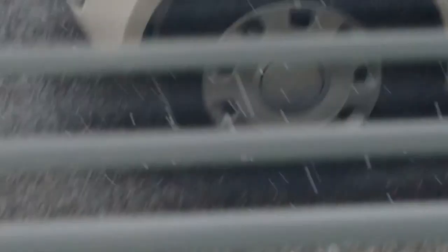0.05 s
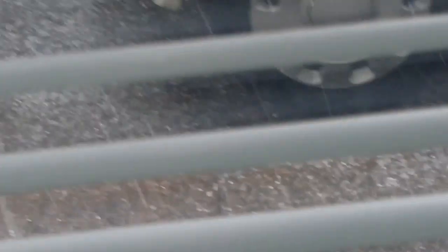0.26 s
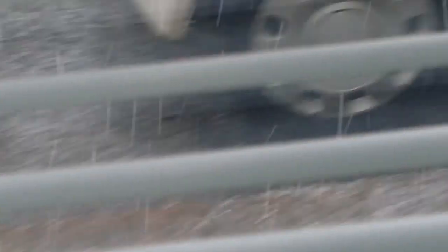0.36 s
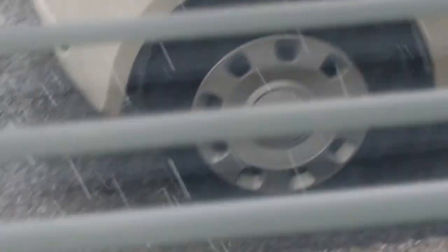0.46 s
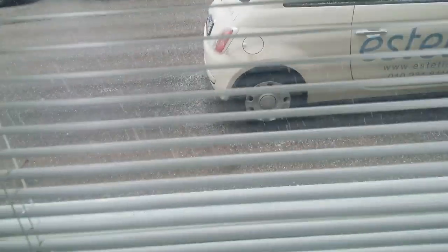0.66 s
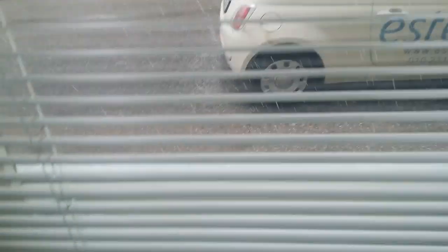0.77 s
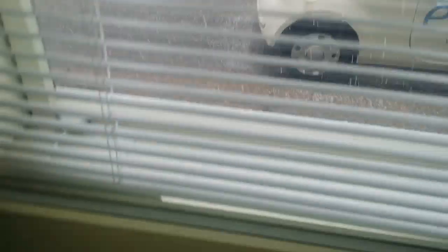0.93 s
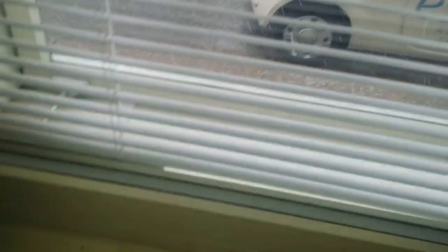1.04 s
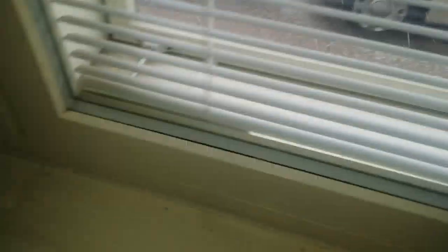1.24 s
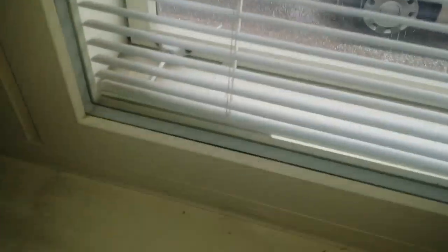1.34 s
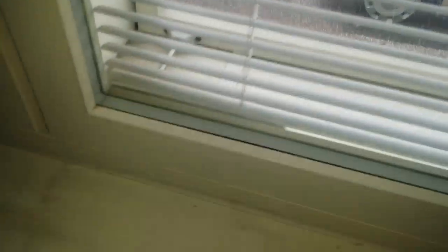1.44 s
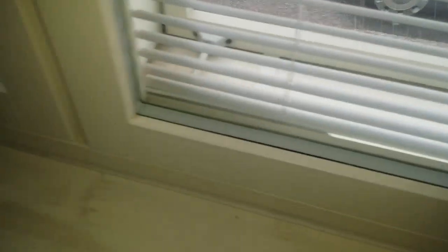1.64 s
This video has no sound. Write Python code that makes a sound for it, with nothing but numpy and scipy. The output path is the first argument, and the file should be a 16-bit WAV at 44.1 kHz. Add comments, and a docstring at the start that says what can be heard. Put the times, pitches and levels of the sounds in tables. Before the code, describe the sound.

Scattered hailstones rap on a windowpane and sill, briefly ringing the glass, heard from inside a room. Close, louder handling noise comes at the start and again past the middle: skin hissing across the microphone, sharp clicks and low bumps.

```python
"""Fingers rub close up as a hand shifts its grip on the microphone; then hail raps on a closed window.
Heard from indoors, single stones clatter on pane and sill and set the glass ringing, over a faint
wash of far hail. In front, at the blinds, skin hisses across the microphone's two ports and catches
with sharp snaps, while the casing rumbles, bumps and ticks under the hand."""
import sys
import numpy as np
from scipy import signal
from scipy.fft import rfft, irfft
from scipy.io import wavfile

SR = 44100
rng = np.random.default_rng(int(sys.argv[2]) if len(sys.argv) > 2 else 0)


def to_wav(sig):
    """Store sig (one row per channel, or 1-D mono) as 16-bit WAV at the path in sys.argv[1].

    Samples outside -1..1 are clipped; the rate is SR.
    """
    pcm = np.clip(np.atleast_2d(sig), -1, 1) * 32767
    pcm = np.round(pcm).astype(np.int16)
    wavfile.write(sys.argv[1], SR, pcm.T)  # frames by channels


N = 74970
T = np.arange(N) / SR


def from_db(db):
    """Decibels to gain."""
    return 10 ** (np.asarray(db) / 20)


def rms_one(x):
    """Scale to rms 1."""
    return x / np.sqrt(np.mean(x ** 2) + 1e-20)


def placed(db, pan_db):
    """Left and right gains; pan_db is left minus right."""
    return from_db(db + np.array([[.5], [-.5]]) * pan_db)


def coloured(spectrum, tilt_db=0):
    """Stereo noise of a given colour, tilted per octave; rms 1."""
    octave = np.log2(np.maximum(np.fft.rfftfreq(N, 1 / SR), 1))
    hz, db = np.transpose(spectrum)
    gain = from_db(np.interp(octave, np.log2(hz), db) + tilt_db * octave)
    return rms_one(irfft(rfft(rng.standard_normal((2, N))) * gain, N))


def resonant_noise(hz, width_hz):
    """Stereo noise twice through one resonance; rms 1."""
    r = np.exp(-np.pi * width_hz / SR)
    section = [1, 0, -1, 1, -2 * r * np.cos(2 * np.pi * hz / SR), r * r]
    return rms_one(signal.sosfilt([section, section], rng.standard_normal((2, N))))


def flicker(depth_db, per_s):
    """A randomly wavering gain of rms 1."""
    return rms_one(from_db(depth_db * np.interp(T * per_s, np.arange(N), rng.standard_normal(N))))


def swell(crest, rise, fall):
    """A bell-shaped envelope with its own rise and fall."""
    return np.exp(-((T - crest) / np.where(T < crest, rise, fall)) ** 2)


def pulse(start, rise_s):
    """Rises to 1 in rise_s, then dies away."""
    age = np.maximum(T - start, 0) / rise_s
    return age * np.exp(1 - np.minimum(age, 60))


def ring(start, hz, rise_s):
    """A heavily damped swing."""
    return pulse(start, rise_s) * np.sin(2 * np.pi * hz * (T - start))


def distant_hail():
    """Countless far stones merge into a faint, flickering wash."""
    # colour of the wash: freq_hz, level_db
    wash = [(30, -5), (70, 13.5), (130, 5), (250, -2), (600, -1.5), (1800, -2), (3500, -5.5), (6000, -4),
            (9000, -13), (16000, -9.5)]
    return placed(db=-73.5, pan_db=-.5) * coloured(wash) * flicker(depth_db=1.5, per_s=160)


def faint_rings():
    """Two brief mid-pitched rings: a hailstone's struck spot, then a port's hollow note under a finger."""
    # resonances: crest_s, rise_s, fall_s, level_db, pan_db, pitch_hz
    rings = [(.633, 0.0025, 0.0084, -64, 16.5, 2320), (1.306, 0.016, 0.029, -59.5, 12, 2920)]
    return sum(placed(db, pan_db) * swell(crest, rise, fall) * resonant_noise(hz, width_hz=740)
               for crest, rise, fall, db, pan_db, hz in rings)


def hailstones():
    """Each stone sets off a short, dense clatter and rings the struck spot and the pane."""
    # hits on the window: start_s, level_db, pan_db, tilt_db_per_octave, spot_hz
    stones = [(0.424, -63, 5, 1, 2430), (.462, -58, -8.5, 3, 2160), (0.629, -57.5, 1.5, -1.5, 2230),
              (0.689, -65.5, 6.5, -1, 1870), (.734, -60.5, 5, 2, 2050), (.872, -55, 2, -.5, 1850),
              (0.913, -57.5, 2, 0, 2100), (.941, -61, 5, 0.5, 1670), (.968, -55, 3.5, 0.5, 2300),
              (.979, -62.5, 1, -0.5, 1720), (1.038, -66, 0.5, 3, 2160), (1.344, -52.5, 4, 1.5, 2070),
              (1.423, -53, -1, -0.5, 2770), (1.482, -54, -1.5, 0, 2220), (1.546, -63, 0, 0.5, 2030),
              (1.58, -54.5, 3, 0.5, 2190), (1.594, -54.5, -1, -1, 1570), (1.620, -60, 6, -4, 1980),
              (1.646, -55, 1.5, 0.5, 1730)]
    # colour of the window's clatter: freq_hz, level_db
    window = [(100, -10), (350, -9), (600, -15), (850, -5), (1300, -6.5), (1900, -1.5), (3000, -6.5),
              (5500, -10.5), (8500, -24), (16000, -28)]
    # ringing modes of the glass: pitch_hz, level_db
    pane_modes = [(770, -11), (950, -27), (1190, -19.5), (1710, -15), (2060, -18.5)]
    attack_s, clatter_t60_s, spot_t60_s, pane_t60_s = 0.0016, 0.16, 0.071, 0.18
    out = 0
    for start, db, pan_db, tilt_db, spot_hz in stones:
        age = np.maximum(T - start, 0)
        attack = 1 - np.exp(-age / attack_s)
        clatter = coloured(window, tilt_db) * from_db(-60 * age / clatter_t60_s)
        spot = resonant_noise(spot_hz, width_hz=710) * from_db(-3 - 60 * age / spot_t60_s)
        modes = sum(from_db(mode_db) * np.sin(2 * np.pi * (hz * age + rng.random((2, 1))))
                    for hz, mode_db in pane_modes)
        pane = modes * from_db(-60 * age / pane_t60_s)
        out += placed(db, pan_db) * attack * (clatter + spot + pane)
    return out


def grip_rumble():
    """The casing rumbles as the grip shifts."""
    # shifts of the grip: crest_s, rise_s, fall_s, level_db, pan_db
    shifts = [(.02, 0.043, 0.11, -69, -1.5), (0.259, 0.092, 0.056, -65, -8),
              (0.478, 0.015, 0.027, -57.5, -13), (.69, 0.039, 0.12, -73.5, -2),
              (0.959, 0.078, 0.13, -73.5, 0), (1.092, 0.015, 0.012, -59, -6), (1.195, 0.037, 0.017, -67, 7),
              (1.35, 0.12, 0.061, -54.5, -8), (1.63, 0.054, 0.049, -66, -7.5)]
    # colour of the rumble: freq_hz, level_db
    rumble = [(20, -16), (55, 2.5), (100, -6), (200, -10.5), (400, -22.5), (1000, -20.5), (4000, -58.5)]
    grip = sum(placed(db, pan_db) * swell(crest, rise, fall) for crest, rise, fall, db, pan_db in shifts)
    return grip * coloured(rumble)


def casing_bumps():
    """Bumps rock the casing in short, low swings."""
    # low thuds: start_s, level_db, pan_db, pitch_hz, rise_s
    bumps = [(0.4653, -55, -18, 83, 0.0043), (0.6112, -46.5, -26.5, 113, 0.0036),
             (1.251, -37, -13, 105.4, 0.0044), (1.3445, -50.5, -15.5, 55.7, 0.0058)]
    return sum(placed(db, pan_db) * ring(start, hz, rise) for start, db, pan_db, hz, rise in bumps)


def fingertip_taps():
    """Each dull tap is a one-sided push with its lows thinned out."""
    # fingertip contacts: start_s, level_db, pan_db, rise_s, push_gain (+ presses, - lifts)
    taps = [(0.2105, -55, -21, 0.00056, 0.82), (0.2383, -43, -15, 0.0002, 0.82),
            (0.4643, -47, -19, 0.00012, 0.82), (.4939, -48.5, -17, 0.00022, 1),
            (0.54, -53.5, -7, 0.00013, 1), (0.6106, -48.5, -16.5, 0.00012, 0.98),
            (1.2540, -25, 16.5, 0.000051, 0.9), (1.254, -32.5, -23, 0.00015, -1.01),
            (1.2558, -29, -24.5, 0.00076, 0.81), (1.2561, -36.5, 17.5, 0.00019, -0.74)]
    pushes = sum(push * placed(db, pan_db) * pulse(start, rise) for start, db, pan_db, rise, push in taps)
    low_cut = signal.butter(1, 150.7, "high", fs=SR, output="sos")
    return signal.sosfilt(low_cut, pushes + 1e-18)


def nail_clicks():
    """A fingernail strikes thin, pitched ticks from the casing."""
    # nail strikes: start_s, level_db, pan_db, pitch_hz
    clicks = [(1.0777, -38, -22, 4380), (1.2544, -31, 13, 1690)]
    # modes of a tick: pitch_ratio, level_db, rise_s
    modes = [(.24, -10.5, 0.00018), (1, -2.5, 0.00031), (1.7, -6, 0.00019), (3.1, -4, 0.0001)]
    return sum(placed(db + mode_db, pan_db) * ring(start, hz * ratio, rise)
               for start, db, pan_db, hz in clicks for ratio, mode_db, rise in modes)


def port_whistle(hz, width_hz=2205, right_ratio=0.77):
    """The hollow note of the two ports, the right one lower and weaker."""
    left = resonant_noise(hz, width_hz)[0]
    right = resonant_noise(hz * right_ratio, width_hz)[1]
    return placed(db=0, pan_db=11) * np.array([left, right])


def finger_rubs():
    """Grainy, uneven friction hiss; the ports sing at a pitch set by where the finger lies."""
    # strokes: crest_s, rise_s, fall_s, level_db, pan_db, whistle_db, whistle_hz, tilt_db_per_octave
    strokes = [(0.061, 0.066, 0.051, -56, 2, -8.5, 6000, 1.2),
               (0.196, 0.041, 0.034, -62, 2.5, -12.5, 5940, 2),
               (0.243, 0.022, 0.0049, -49, -10, -16, 6000, 1),
               (0.259, 0.0095, 0.0022, -42, -17.5, -0.5, 6200, 1.5),
               (0.289, 0.021, 0.03, -64.5, -0.5, -23, 5700, -1.5),
               (0.354, 0.03, 0.023, -65, 2, -23, 5800, -1),
               (0.498, 0.027, 0.036, -58.5, 1.5, -16, 5830, 1.5),
               (0.615, 0.057, 0.052, -66, -5.5, -19, 5700, 0.5),
               (0.709, 0.096, 0.044, -70, -1.5, -19, 5700, 0),
               (1.086, 0.015, 0.042, -57.5, -7, -1.5, 5500, 0),
               (1.143, 0.017, 0.11, -62.5, 0.5, -12, 5700, -2),
               (1.204, 0.03, 0.021, -50.5, 2.5, -3, 5300, 1), (1.27, 0.041, 0.016, -51, 2, -5.5, 6000, 1),
               (1.302, 0.027, 0.037, -48, 1, -18, 5500, 1), (1.351, 0.031, 0.032, -55, -0.5, -16, 5300, 0),
               (1.4, 0.03, 0.039, -51.5, 1, -8.5, 5350, 0.6), (1.469, 0.083, 0.15, -66, 1, -16, 5800, -1.5),
               (1.655, 0.045, 0.035, -60, 0.5, -11, 6000, 0)]
    # colour of the friction: freq_hz, level_db
    friction = [(40, -2.5), (100, 5), (250, 2), (600, 0), (1200, -3.5), (2300, 1.5), (3600, -2),
                (5500, 0.5), (8800, -7), (11500, -6), (14000, -10.5), (16000, -8)]
    air = from_db(-17) * resonant_noise(hz=14600, width_hz=1900)  # airy overtone of the ports
    rubs = 0
    for crest, rise, fall, db, pan_db, whistle_db, whistle_hz, tilt_db in strokes:
        hiss = coloured(friction, tilt_db)
        whistle = from_db(whistle_db) * port_whistle(whistle_hz)
        rubs += placed(db, pan_db) * swell(crest, rise, fall) * (hiss + air + whistle)
    rings = faint_rings()  # these waver along with the rubs
    grain = flicker(depth_db=1.5, per_s=900)
    stick_slip = flicker(depth_db=0.88, per_s=190)
    return (rubs + rings) * grain * stick_slip


def finger_snaps():
    """A finger catches and snaps free, sending a millisecond crack through the casing."""
    # releases: start_s, level_db, pan_db, tilt_db_per_octave, grip_stiffness (under 1 rings longer)
    snaps = [(0.2223, -38, -20.5, 4.5, 1), (0.236, -34.5, -11, -3.5, 1), (0.2381, -29, -13, -0.5, 1),
             (0.2581, -31, -18, -0.5, 0.57), (0.2585, -16, -18.5, 1.3, 0.71), (0.4936, -38.5, -10, 2, 1),
             (1.0988, -46.5, -25, -2, 1), (1.2541, -43, -10, 7, 0.54)]
    # modes of casing and port: pitch_hz, level_db, rise_s
    casing = [(620, -21.5, 0.00034), (1454, -17, 0.00049), (2350, -21, 0.00042), (4180, -6, 0.00016),
              (7050, -2, 0.000084), (14300, -16, 0.000078)]
    port_hz = 5690  # the tilt pivots on the port's cavity note
    out = 0
    for start, db, pan_db, tilt_db, stiffness in snaps:
        for k, (hz, mode_db, rise) in enumerate(casing):
            level_db = db + mode_db + tilt_db * np.log2(hz / port_hz)
            polarity = (-1) ** k  # neighbouring modes swing opposite ways
            out += placed(level_db, pan_db) * polarity * ring(start, hz, rise / stiffness)
    return out


def scene():
    """Hail beyond the glass, the hand close by."""
    hail = hailstones() + distant_hail()
    sliding = finger_rubs() + grip_rumble()
    hits = casing_bumps() + fingertip_taps() + nail_clicks() + finger_snaps()
    return hail + sliding + hits


def record(dry, cutoff_hz=15650):
    """A steep low-pass takes off the very top."""
    return signal.sosfilt(signal.ellip(10, .1, 70, cutoff_hz, fs=SR, output="sos"), dry)


dry = scene()
out = record(dry)
to_wav(out)
```